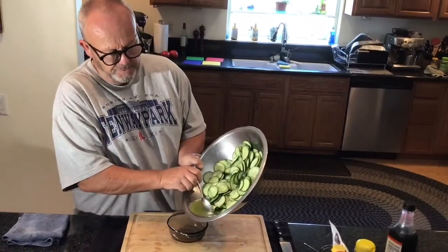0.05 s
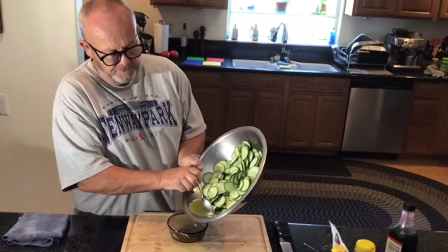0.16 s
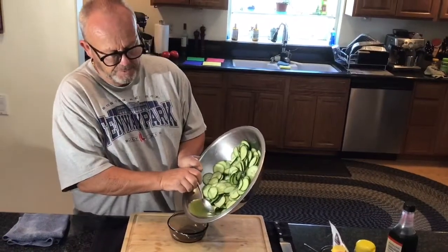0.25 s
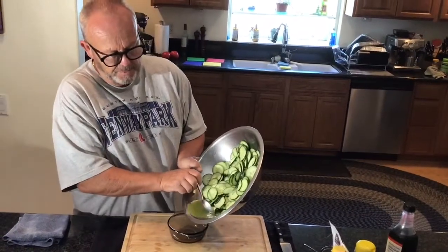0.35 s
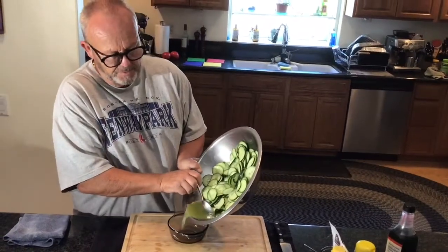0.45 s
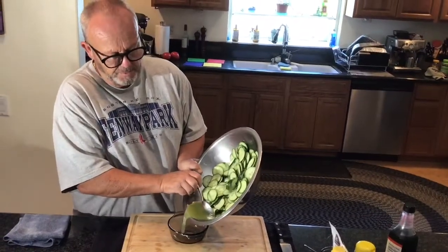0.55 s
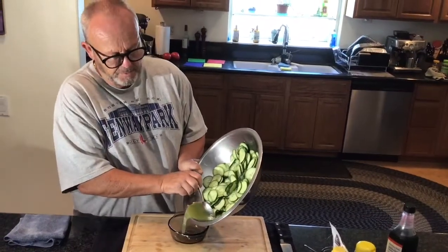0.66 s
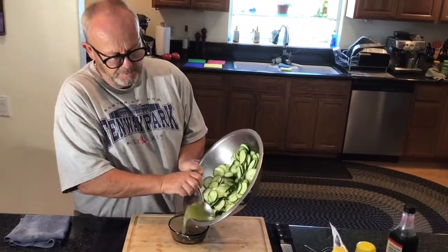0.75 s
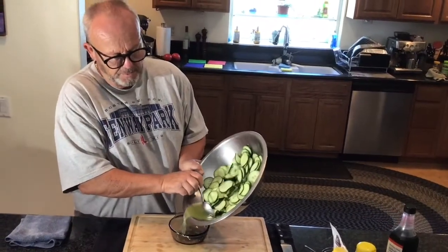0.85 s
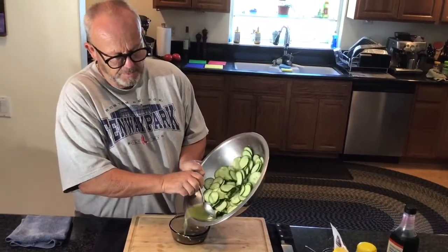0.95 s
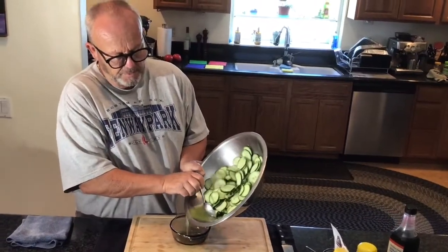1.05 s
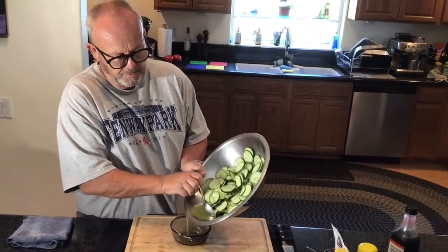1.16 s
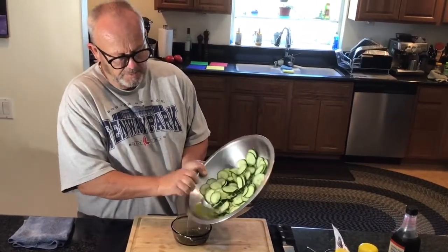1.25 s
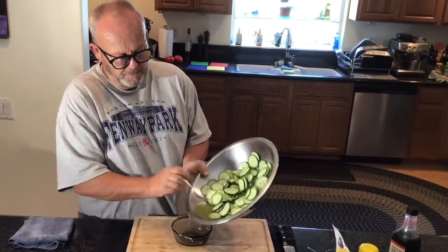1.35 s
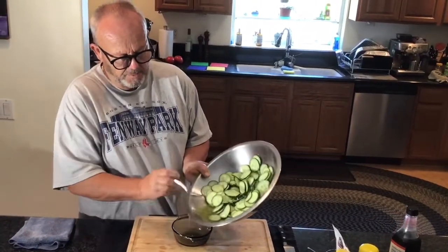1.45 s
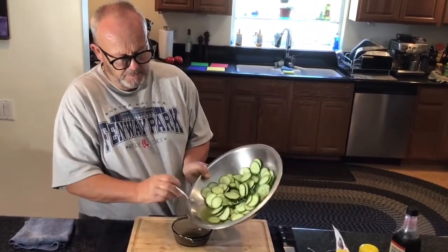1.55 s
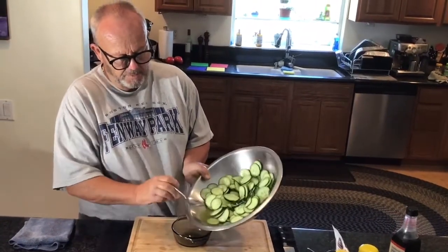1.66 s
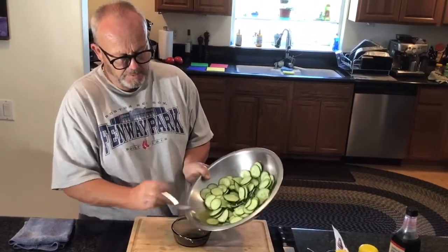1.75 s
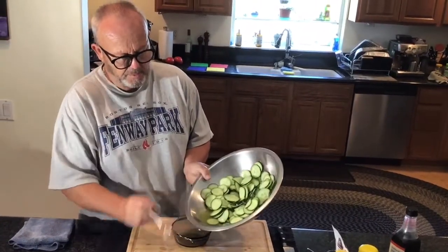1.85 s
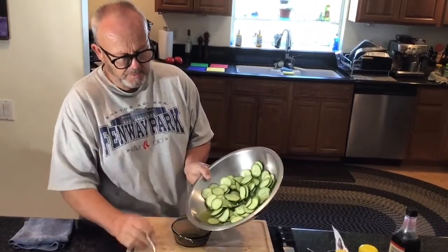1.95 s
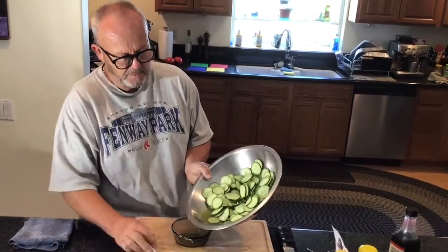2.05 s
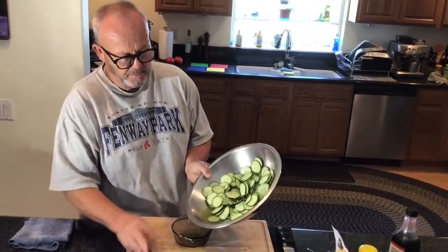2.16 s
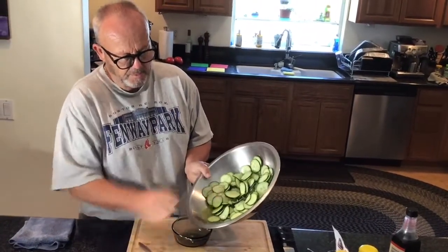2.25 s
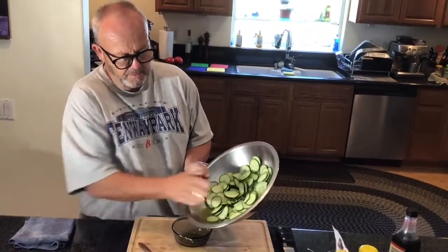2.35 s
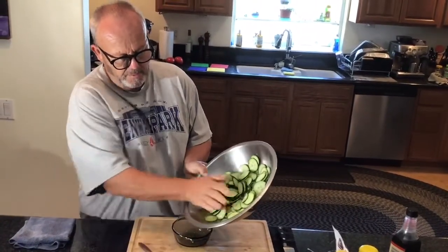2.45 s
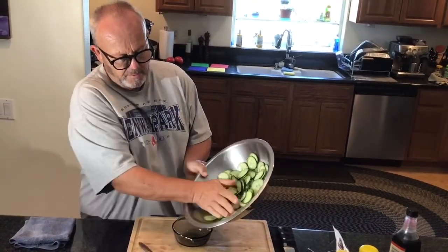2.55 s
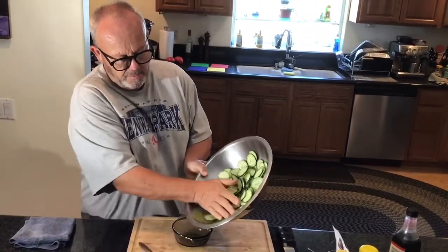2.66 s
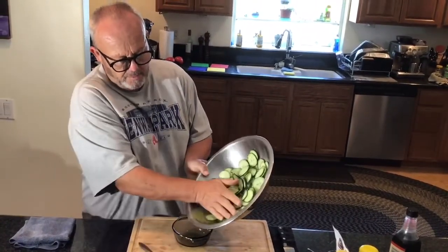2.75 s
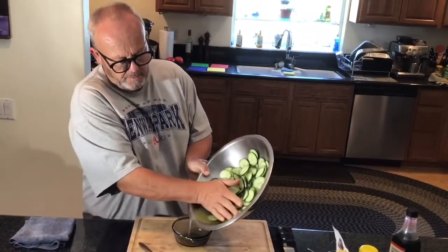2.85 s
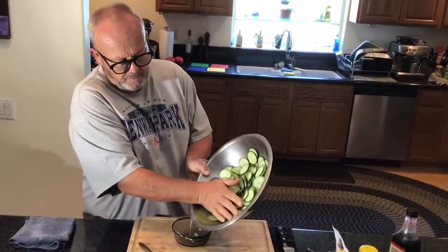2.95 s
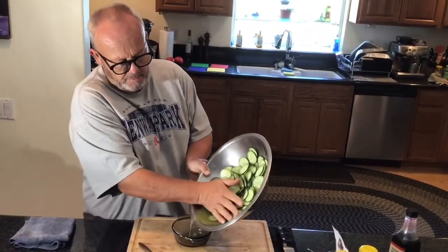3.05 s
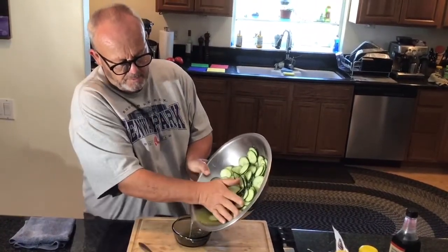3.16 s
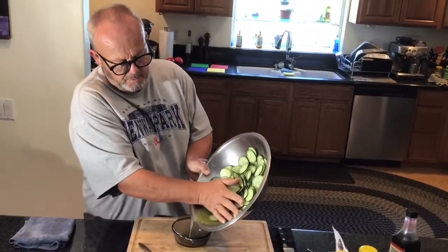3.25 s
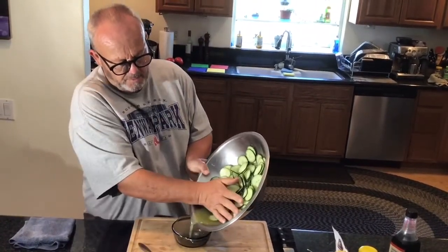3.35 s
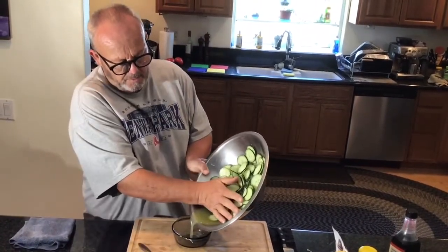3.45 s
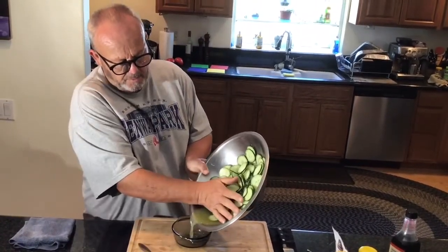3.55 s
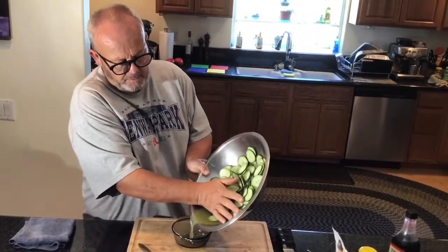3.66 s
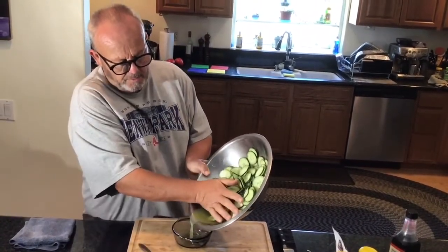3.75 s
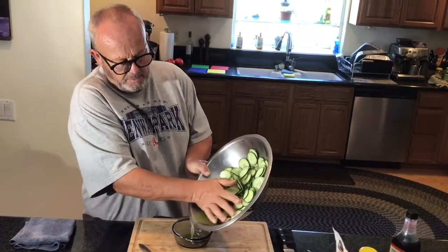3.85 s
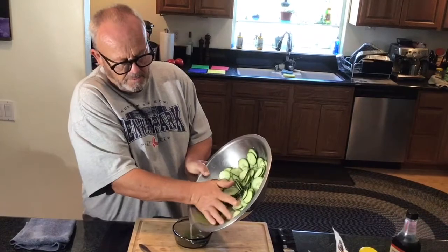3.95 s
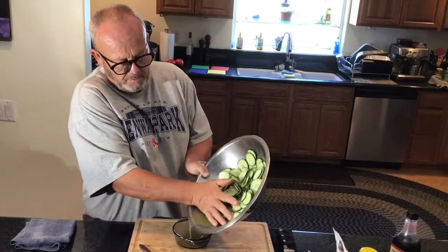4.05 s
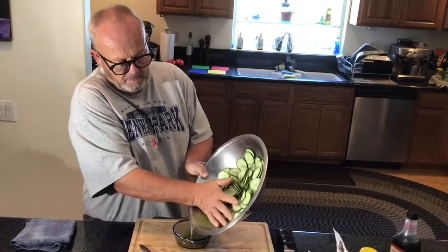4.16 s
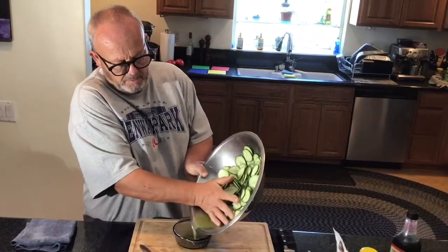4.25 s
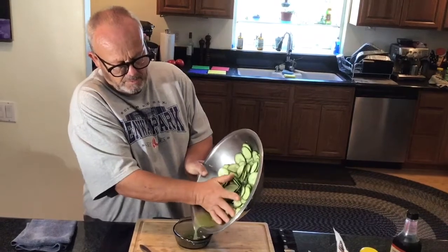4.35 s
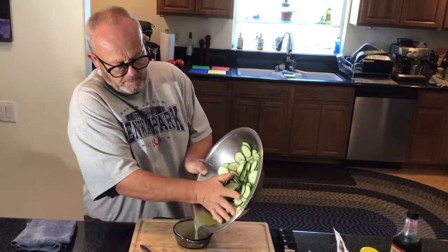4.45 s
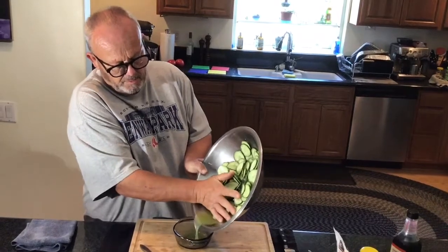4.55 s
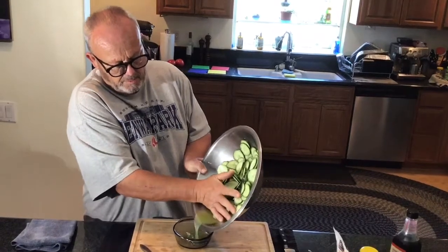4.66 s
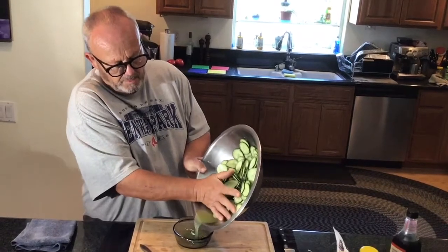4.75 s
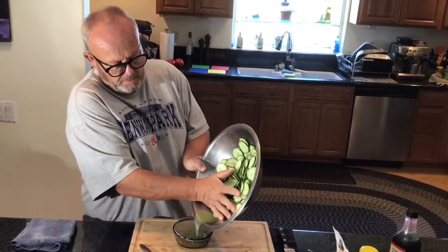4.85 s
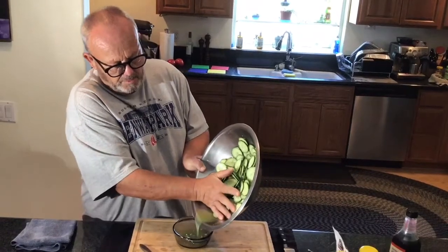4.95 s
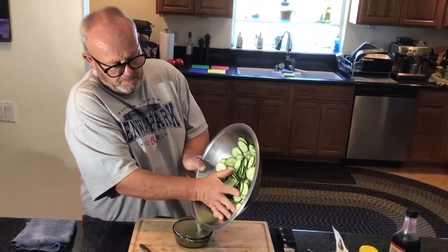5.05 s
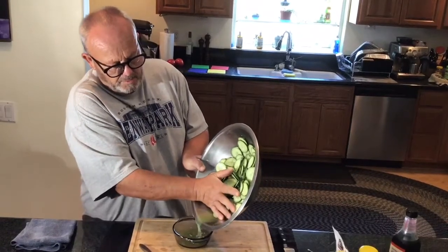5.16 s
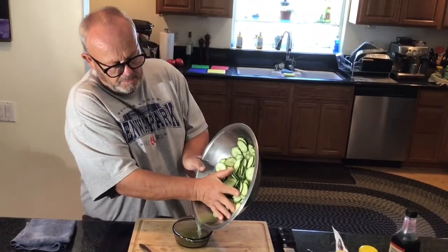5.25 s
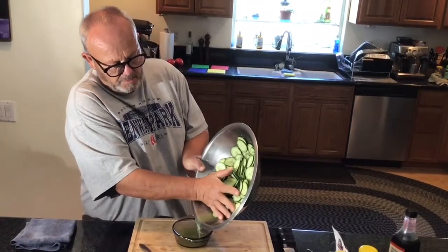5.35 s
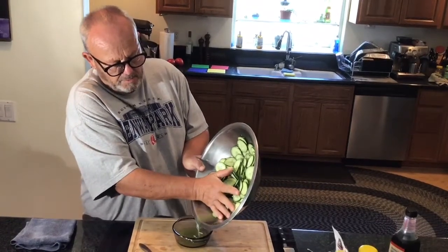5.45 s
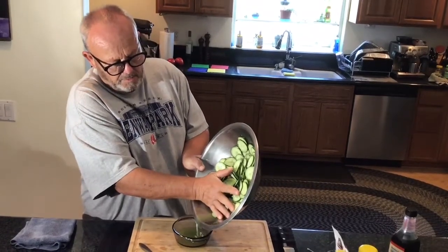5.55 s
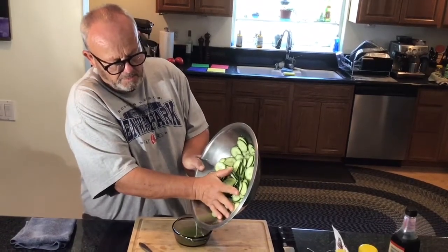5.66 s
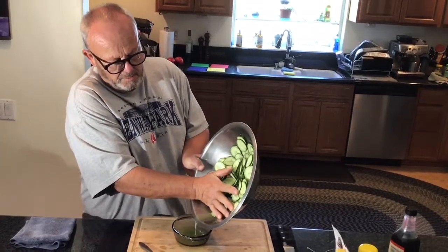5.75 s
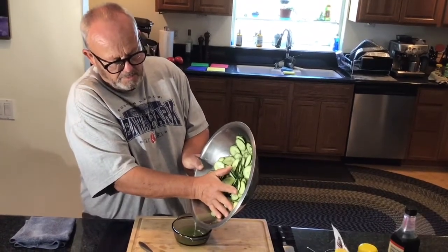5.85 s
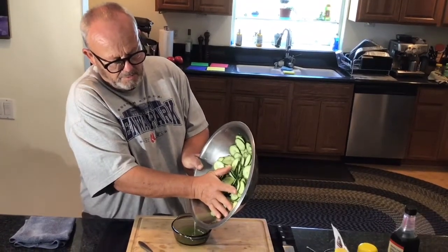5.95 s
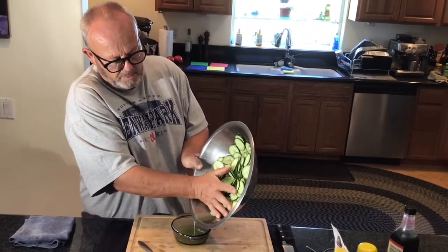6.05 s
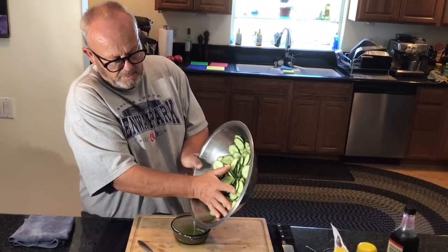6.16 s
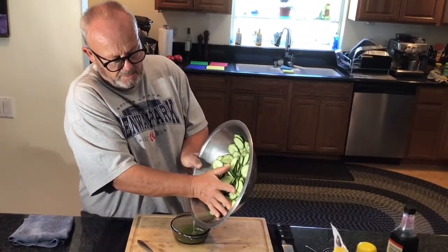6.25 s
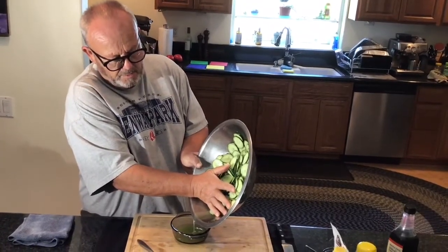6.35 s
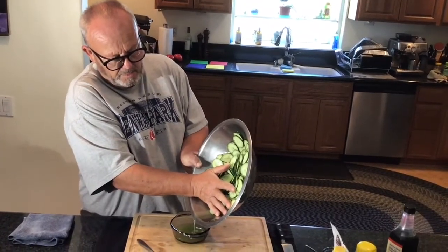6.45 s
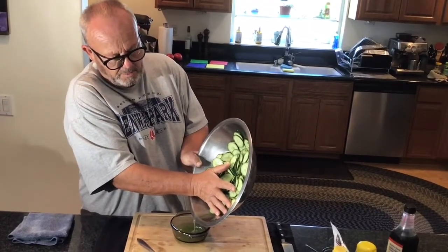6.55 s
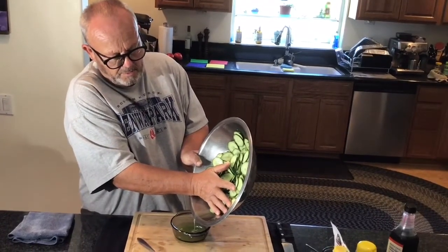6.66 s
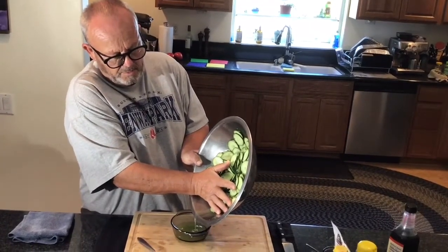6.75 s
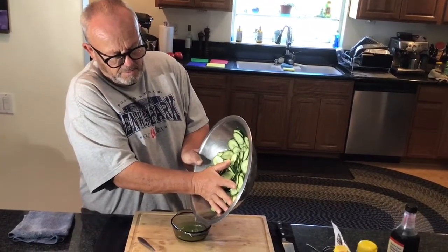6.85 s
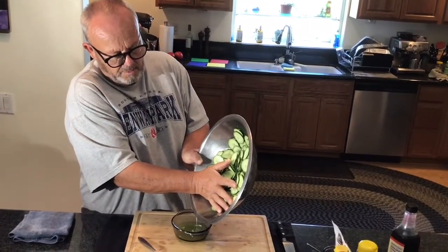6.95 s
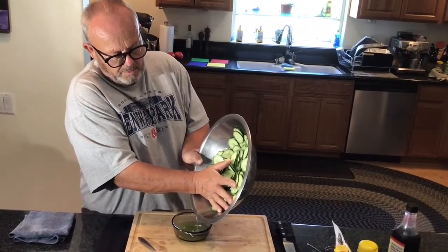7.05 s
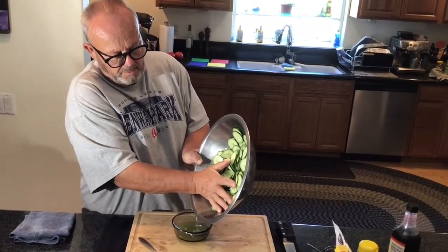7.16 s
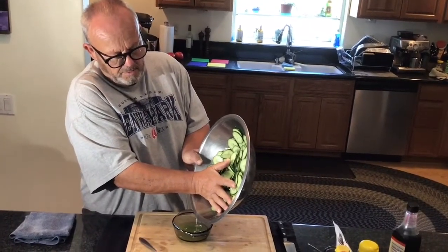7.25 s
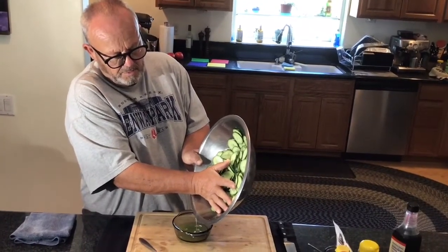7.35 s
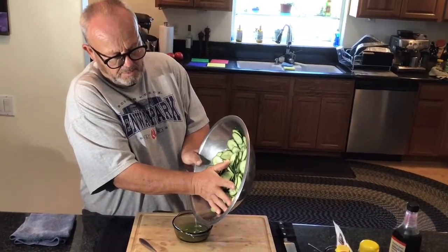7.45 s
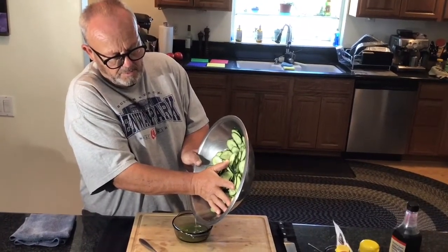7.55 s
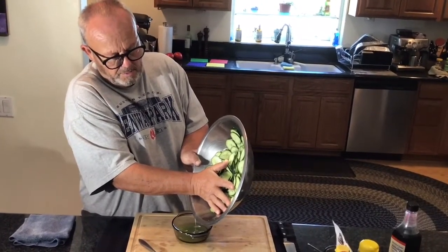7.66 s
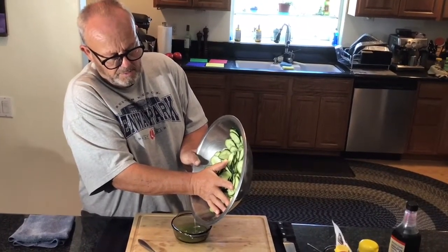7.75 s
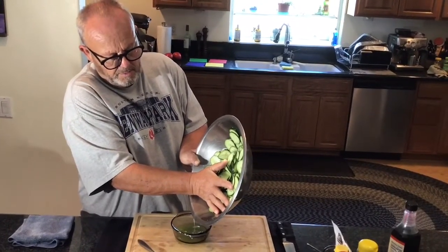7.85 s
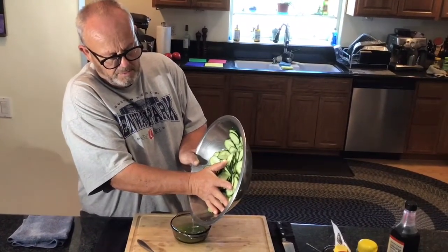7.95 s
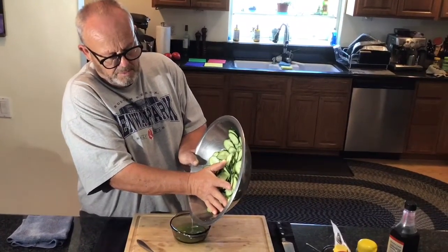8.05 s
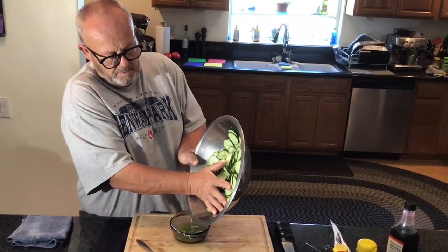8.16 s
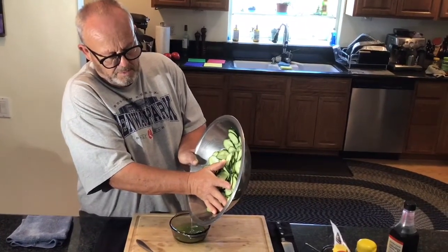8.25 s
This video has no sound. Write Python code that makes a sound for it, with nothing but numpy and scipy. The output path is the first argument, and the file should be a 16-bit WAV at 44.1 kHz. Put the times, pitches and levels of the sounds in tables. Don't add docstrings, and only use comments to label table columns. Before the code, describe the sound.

Light spoon scrapes and taps on steel, a sharp knock and rattle on wood, then sparse watery drips ringing a little glass bowl over faint fridge hum.

```python
import sys
import numpy as np
from scipy import signal
from scipy.io import wavfile
from scipy.ndimage import uniform_filter1d

SR = 44100
rng = np.random.default_rng(int(sys.argv[2]) if len(sys.argv) > 2 else 0)


def materialize(psi):
    bounded = np.clip(np.atleast_2d(psi).T, -1, 1)
    quanta = np.round(bounded * 32767).astype(np.int16)
    wavfile.write(sys.argv[1], SR, quanta)


def gain_from_db(level_db):
    decades = np.asarray(level_db, float) / 20
    return 10 ** decades


N = 366515
BOUNCE_S = 1.95


def band(x, hz, width):
    return signal.lfilter(*signal.iirpeak(min(hz, .45 * SR), max(hz / width, .3), fs=SR), x)


def lowpass(x, order, hz):
    return signal.sosfilt(signal.butter(order, hz, fs=SR, output="sos"), x)


def level(x, db):
    return x * gain_from_db(db) / np.sqrt(np.mean(x ** 2))


def add(out, s, x):
    i = int(s * SR)
    out[i:i + len(x)] += x[:N - i]


def walk(rate):
    k = int(SR / rate)
    held = np.repeat(rng.standard_normal(N // k + 1), k)
    return 0.69 * uniform_filter1d(uniform_filter1d(held, k), k)[:N]


def kitchen():
    # f/Hz, density/(dB per Hz)
    air = [(15, -46), (25, -18.5), (49, -5), (92, 2), (175, -8), (236, -10.5), (293, -10.5), (796, -17.5),
           (1520, -28), (2480, -28.5), (2690, -35.5), (2910, -32), (4030, -31), (14800, -39.5),
           (16000, -51)]
    # f/Hz, width/Hz, level/dB
    hum_bands = [(90, 69, -76), (242, 13, -76), (3924, 15, -99), (4700, 11, -101)]
    out, swell = 0, walk(0.61)
    hz_points, db_points = np.transpose(air)
    for hz in 25 * 2 ** np.arange(0, 9.4, 1 / 3):
        db = np.interp(np.log(hz), np.log(hz_points), db_points) + .5 * swell + 0.65 * walk(4.4)
        out = out + gain_from_db(db) * band(band(rng.standard_normal(N), hz, hz / 3), hz, hz / 2)
    out = signal.sosfilt(signal.ellip(6, .2, 9, 15000, fs=SR, output="sos"), out)
    hum = sum(level(band(rng.standard_normal(N), hz, width), db) for hz, width, db in hum_bands)
    whine_hz = 2600 + 3 * walk(1.8)
    whine = gain_from_db(-87 + 2.0 * walk(5)) * np.sin(2 * np.pi * np.cumsum(whine_hz) / SR)
    return level(out, -66.5) + hum + whine


def room(x, first_s=0.0034):
    # f/Hz, T60/s
    room_t60 = [(200, 0.6), (700, 0.43), (2000, 0.35), (5000, 0.47), (10000, 0.086), (16000, 0.074)]
    t = np.arange(SR * 3 // 4) / SR
    hz_points, t60_points = np.transpose(room_t60)
    tail = 0
    for hz in 125 * 2 ** np.arange(0, 7.4, .5):
        t60 = np.interp(np.log(hz), np.log(hz_points), t60_points)
        tail = tail + band(rng.standard_normal(len(t)), hz, hz / 2.0) * 1000. ** (-t / t60)
    tail = tail * np.clip(t / first_s - .5, 0, 1)
    return signal.fftconvolve(x, tail / np.sqrt(np.sum(tail ** 2)))[:N]


def glass():
    # t/s, peak level/dB
    drops = [(3.7996, -63), (3.8535, -59), (4.153, -62), (4.17, -66), (4.227, -69), (4.4893, -72.5),
             (4.6237, -71), (4.8, -62.5), (4.83, -65), (4.86, -71), (4.9482, -75), (5.0035, -62.5),
             (5.2026, -71), (5.401, -59), (5.408, -58), (5.434, -71.5), (6.7994, -76.5), (6.873, -70),
             (7.1121, -53.5), (7.1354, -63), (7.148, -59.5), (7.224, -62), (7.259, -61), (7.4576, -63),
             (7.51, -66), (7.7064, -64), (7.889, -71), (7.9194, -68), (8.088, -68), (8.265, -71)]
    full_hz, sink_hz, fill_s, t60 = 4720, 640, 1.39, 0.078
    out, t = np.zeros(N), np.arange(8192) / SR
    for (s, db), (split, phase) in zip(drops, rng.random((len(drops), 2))):
        hz = full_hz + sink_hz * np.exp(-(s - drops[0][0]) / fill_s)
        pair = np.sin(2 * np.pi * hz * t)
        pair += 0.5 * np.sin(2 * np.pi * ((hz + 30 + 50 * split) * t + phase))
        pair *= 1 + 1.04 * np.exp(-t / 0.006)
        pair *= np.minimum(t / 0.00055, 1)
        add(out, s, gain_from_db(db - 10.0) * pair * 1000. ** (-t / t60))
    return out


def bubble(hz, cycles, glide):
    turns = np.arange(int(1.2 * cycles * SR / hz)) / SR * hz
    life = turns / cycles
    ring = np.sin(2 * np.pi * turns * (1 + (glide - 1) * life))
    return ring * 1000. ** -life * np.minimum(turns / 1.07, 1)


def tick(hz, decay_s=0.0025):
    t = np.arange(512) / SR
    snap = rng.standard_normal(512) * np.exp(-t / decay_s)
    snap = signal.sosfilt(signal.butter(4, min(hz, 15000), "high", fs=SR, output="sos"), snap)
    return 1.25 * band(snap, 1.14 * hz, 1.05 * hz)


def brine():
    # t/s, peak level/dB, f/Hz, life/cycles, glide ratio
    gulps = [(3.714, -62, 1576, 67, 0.91), (3.8855, -60, 2930, 19, 1), (3.738, -71.5, 1990, 35, 1.5),
             (3.9933, -68, 1990, 14, 1.2), (4.415, -61.5, 1900, 18, 1.37), (4.634, -66, 2730, 75, 1),
             (5.1388, -61, 3160, 45, 1.5), (5.203, -66, 1500, 105, 1.14), (5.24, -64.5, 1605, 69, 1.05),
             (5.318, -70, 2450, 50, 1.1), (5.335, -68, 2650, 42, 0.92), (5.36, -69, 2500, 40, 0.92),
             (5.432, -68.5, 2500, 50, .9), (5.452, -70, 2250, 40, .95), (5.472, -67, 2100, 46, .95),
             (5.3993, -61.5, 2417, 48, 1.1), (6.146, -66.5, 2040, 51, 1.23), (6.2305, -62, 1635, 40, 0.96),
             (6.4763, -65, 2230, 51, 0.89), (6.876, -68.5, 1990, 60, 0.94), (7.2199, -61, 2580, 69, 1.03),
             (7.468, -71, 2600, 49, 1.05), (7.5079, -70, 2210, 77, 0.97), (7.6749, -64, 2520, 45, 0.95),
             (7.872, -59, 3100, 39, 1.05), (8.0817, -67, 2930, 46, 0.97), (8.2626, -64, 2770, 52, 1.05)]
    # t/s, peak level/dB, f/Hz
    plinks = [(3.817, -70, 3950), (3.831, -67, 4080), (3.87, -52.5, 6960), (3.903, -62.5, 7000),
              (4.4912, -81.5, 5070), (4.511, -70, 5200), (4.773, -71.5, 4050), (5.1387, -61.5, 3410),
              (5.158, -67, 5500), (5.3306, -66, 4550), (6.6228, -62, 7740), (6.782, -66.5, 4590),
              (6.873, -64, 5490), (7.221, -55.5, 4220), (7.2547, -57, 6480), (7.5075, -64, 4960),
              (7.6972, -58, 7400), (7.797, -64, 6930), (7.84, -60.5, 7600), (7.868, -70, 4060),
              (7.889, -54.5, 5010), (7.959, -61.5, 5700), (8.262, -67, 4580)]
    # t/s, peak level/dB, f/Hz
    tiny = [(3.72, -63.5, 12840), (3.782, -57, 10800), (3.8691, -48, 8700), (4.0088, -60, 13200),
            (4.302, -62.5, 8500), (4.491, -61, 8500), (4.5117, -55.5, 8200), (4.696, -64, 8200),
            (4.7991, -64, 9320), (4.816, -52.5, 8160), (4.865, -56.5, 8100), (4.9296, -54.5, 8300),
            (5.0146, -61, 14400), (5.3997, -52.5, 14780), (6.167, -63.5, 15400), (6.4938, -60, 9960),
            (6.598, -54, 13400), (6.873, -65, 9380), (7.1113, -65, 9830), (7.124, -53, 10200),
            (7.2206, -67, 8640), (7.2408, -49.5, 8750), (7.4483, -59, 10440), (7.5064, -56, 10730),
            (7.6967, -59, 10500), (7.7634, -59, 14700), (7.7955, -67, 9110), (7.8405, -59.5, 9100),
            (7.8886, -67, 8300), (7.9576, -60, 8500)]
    # t/s, f/Hz
    specks = [(3.989, 8700), (4.1511, 8500), (4.3546, 14500), (5.3469, 13200), (5.42, 9500), (6.145, 13040),
              (6.5347, 14500), (6.622, 11300), (7.6112, 8600), (7.8686, 8480), (8.1709, 14200),
              (8.2712, 14100)]
    # t/s, peak level/dB, f/Hz
    splashes = [(3.745, -70, 2470), (3.7953, -56, 3950), (3.805, -60, 4200), (3.847, -63, 5700),
                (3.867, -58, 5900), (3.88, -65, 3700), (4.152, -66, 6200), (4.203, -65, 2600),
                (4.292, -63, 4850), (4.488, -67, 3000), (4.8155, -61, 4800), (4.817, -62, 6600),
                (4.8315, -58, 4000), (4.839, -63, 4300), (4.948, -60, 4650), (5.203, -66, 4150),
                (5.228, -64, 2540), (5.2285, -67, 3400), (6.146, -66, 4900), (6.168, -68, 2100),
                (6.268, -66, 1700), (6.52, -67, 7000), (6.784, -67, 3300), (6.812, -68, 2100),
                (6.9335, -61, 4100), (6.942, -63, 4200), (6.97, -67, 4100), (7.111, -59, 6800),
                (7.1112, -56, 4700), (7.221, -61, 6700), (7.264, -61, 4200), (7.265, -65, 2000),
                (7.277, -62, 5900), (7.295, -63, 5900), (7.301, -64, 5000), (7.458, -63, 4600),
                (7.5075, -58, 7000), (7.611, -67, 4400), (7.869, -64, 2300), (8.026, -66, 3500),
                (8.057, -67, 2600), (8.09, -67, 4400)]
    # t/s, spray level/dB
    flow = [(3.65, -82), (3.9, -83.5), (4.3, -79.5), (4.7, -80.5), (5.0, -77), (5.45, -69.5), (5.6, -90.5),
            (6.05, -88.5), (6.5, -79), (6.9, -75), (7.3, -87.5), (7.9, -79.5), (8.3, -90)]
    out = np.zeros(N)
    for s, db, hz, cycles, glide in gulps:
        add(out, s, gain_from_db(db) * bubble(hz, cycles, glide))
        add(out, s, gain_from_db(db - 11) * tick(0.92 * hz, decay_s=0.0053))
    for s, db, hz in plinks:
        add(out, s, gain_from_db(db + 1.0) * bubble(hz, 73, 0.94))
        add(out, s, gain_from_db(db - 3.5) * tick(0.88 * hz))
    for s, db, hz in tiny + [(s, -64.5, hz) for s, hz in specks]:
        add(out, s, gain_from_db(db) * bubble(hz, 42, 1.04))
        add(out, s, gain_from_db(db - 7) * tick(0.79 * hz))
    for s, db, hz in splashes:
        add(out, s, gain_from_db(db + 2.5) * bubble(hz, 27.9, 1.05))
    for at, pitch, size in rng.random((900, 3)):
        s = flow[0][0] + (flow[-1][0] - flow[0][0]) * at
        db = np.interp(s, *np.transpose(flow)) - 2.7 * np.log(max(size, .07))
        add(out, s, gain_from_db(db) * bubble(2200 * 5 ** pitch ** 1.5, 14, 1.3))
    return out


def rim():
    # t/s, peak level/dB, centre f/Hz, width/Hz, decay/s
    scrapes = [(0.0, -54.5, 3900, 970, .027), (.033, -70, 3950, 700, .033), (.017, -66, 1400, 200, .027),
               (.31, -54, 700, 300, .006), (.323, -58, 665, 294, .0094), (.334, -57.5, 2330, 500, .023),
               (.335, -59, 4120, 1500, .023), (.337, -62.5, 11000, 9000, .015),
               (.371, -62, 2420, 600, .015), (.362, -65.5, 6000, 6000, .018), (.537, -70, 3710, 300, .007),
               (0.0, -57, 500, 200, .01), (.8178, -68, 9100, 300, .015), (.82, -74, 5720, 100, .04),
               (1.2033, -45.5, 2740, 1300, .0054), (1.2027, -51, 7500, 7000, .0024),
               (1.224, -67.5, 2750, 400, .04), (1.794, -64.5, 2150, 1200, .026)]
    # t/s, peak level/dB, f/Hz
    taps = [
        (.775, -72, 11000),
        (1.2029, -58, 1300),
        (1.2058, -55, 5000),
        (.334, -68, 2330),
        (.8178, -64, 6500),
        (1.2033, -50, 2740),
        (1.2027, -56, 8500),
    ]
    out, t = np.zeros(N), np.arange(8192) / SR
    for s, db, hz, width, length in scrapes:
        slips = rng.standard_normal(8192) * rng.random(8192) ** 2
        slips[0] = 3.7
        scrape = band(band(slips, hz, width), hz, 2 * width)
        add(out, s, level(scrape, db - 8.0) * np.exp(-t / length))
    for s, db, hz in taps:
        add(out, s, gain_from_db(db) * tick(hz))
    return out


def board():
    # f/Hz, width/Hz, level in the first fall/dB, level after the bounce/dB
    modes = [(149, 40, -17.5, -16), (273, 23, -5.5, -4.5), (472, 100, -11.5, -6), (640, 56, 2.5, -2),
             (797.4, 48, -9, -1.5), (970, 120, -11, -13.5), (1145, 120, -7, -8), (1360, 70, -7, -11.5),
             (1395, 69, -11, -0.5), (1500, 80, -1.5, -7.5), (1608, 100, -8, -10.5), (1880, 260, -9.5, -8),
             (2100, 60, 2.5, 1.5), (2275, 85, -2, 2.5), (2300, 49, -4, -4.5), (2470, 80, -9, -7.5),
             (2669, 170, -8.5, -7), (2930, 120, -3, -3), (3305, 61, -3, -2), (3700, 400, -11.5, -12.5),
             (4300, 300, -21.5, -9.5)]
    # t/s, blow level/dB, striking spot round the spoon (0-1), edge crack level/dB
    knocks = [(1.8179, -30.5, 0.6, -14), (1.8178, -11.5, 0.41, -36), (1.8215, -32, 0.17, -26.5),
              (1.828, -39, .36, -42.5), (1.86, -47, 0, -31.5), (1.90, -33, 0.9, -35),
              (1.935, -54, 0.1, -35), (1.9555, -18.5, 1, -22), (1.959, -19.5, 0.74, -19.5),
              (1.9675, -19, 0.21, -30), (1.977, -25, 0.44, -34.5), (1.972, -26.5, 0.9, -21.5),
              (1.981, -29.5, 0.76, -15), (1.992, -26, 0.45, -25), (2.003, -31, 0.84, -28),
              (2.012, -22.5, 0.75, -32), (2.024, -28.5, 0.9, -25), (2.037, -26, 0.8, -30),
              (2.048, -27.5, 0.49, -34.5), (2.06, -34, 0.42, -32), (2.068, -31.5, 0.3, -31),
              (2.083, -35.5, 0.93, -18), (2.1, -40, 0.9, -28), (2.125, -41, 0.6, -28),
              (2.15, -62, 0.6, -23.5), (2.19, -59, 0.8, -29), (2.235, -58, 0.5, -28)]
    # t/s, level/dB
    rattle = [(1.815, -88), (1.821, -56), (1.87, -62), (1.95, -72), (1.958, -42), (1.985, -40.5),
              (2.03, -49), (2.07, -54), (2.12, -69), (2.2, -72), (2.3, -90)]
    wood, crack, t = np.zeros(N), np.zeros(N), np.arange(8192) / SR
    family = np.searchsorted([1000, 2500], np.array(modes)[:, 0])
    for s, db, spot, crack_db in knocks:
        family_db = 6.5 * np.cos(2 * np.pi * (spot - np.arange(3) / 3))
        chatter = rng.standard_normal(8192) * np.exp(-t / 0.0022)
        push = 0.08 * chatter + 7.29 * (t == 0)
        scatter = rng.standard_normal((len(modes), 2))
        for i, (hz, width, *fall_db) in enumerate(modes):
            detune, luck = scatter[i]
            mode_db = db + family_db[family[i]] + fall_db[s > BOUNCE_S] + 2.0 * luck
            ring = band(push, hz * (1 + .008 * detune), width)
            add(wood, s, (-1) ** i * gain_from_db(mode_db) * ring)
        add(crack, s, gain_from_db(db + crack_db) * chatter * np.exp(-t / 0.0032))
    buzz_db = np.interp(np.arange(N) / SR, *np.transpose(rattle), left=-200, right=-200)
    buzz = rng.standard_normal(N) * rng.random(N) ** 3 * gain_from_db(buzz_db)
    edge = gain_from_db(11.5) * band(band(crack, 6000, 7100), 6000, 7000)
    edge += gain_from_db(7.5) * band(band(buzz, 2600, 1800), 2600, 2500)
    edge += gain_from_db(2.5) * band(buzz, 7800, 3000)
    first_snap = gain_from_db(-2.5) * band(crack, 13000, 6000) * (np.arange(N) < BOUNCE_S * SR)
    return gain_from_db(8.5) * lowpass(wood, 3, 3900) + lowpass(edge, 4, 10500) + first_snap


def spoon():
    # f/Hz, group (0-3), level in the first fall/dB, level after the bounce/dB, T60/s
    modes = [(4920, 0, -6, -6, .25), (4450, 0, -25, -22, .3), (2960, 0, -30, -17, .2),
             (3280, 0, -30, -20, .2), (4161, 0, -40, -25, .2), (4237, 0, -40, -27, .2),
             (6078, 1, -5, 0, .3), (8812, 1, -9, -19, .5), (9378, 2, -8, -8, .4), (10335, 2, -12, -11, .3),
             (10595, 2, -5, -2, .3), (13808, 3, -14, -3, .2), (14018, 3, -14, -5, .2),
             (15060, 3, -14, -7, .2), (15712, 3, -14, -9, .2)]
    # t/s, ring level of low modes/dB, of middle modes/dB
    low_blows = [(1.816, -35.5, -49), (1.832, -67, -62), (1.8592, -45, -60), (1.8994, -51.5, -73),
                 (1.955, -24.5, -59), (1.971, -54, -42.5), (1.9814, -36, -45), (1.9914, -56, -43.5),
                 (2.003, -36, -41), (2.012, -33.5, -45.5), (2.021, -34, -38), (2.0344, -38.5, -48.5),
                 (2.0507, -32, -59), (2.072, -50, -50), (2.079, -36.5, -67), (2.099, -43, -63),
                 (2.1244, -44, -73), (2.1494, -49.5, -60), (2.1644, -78.5, -75), (2.1876, -74, -67.5),
                 (2.218, -67, -68), (2.2263, -85, -97.5), (2.2397, -86.5, -78), (2.27, -95, -76)]
    # t/s, ring level of high modes/dB, of topmost/dB
    landings = [
        (1.8175, -64, -73),
        (1.8592, -82.5, -78.5),
        (1.9562, -47, -51),
        (1.969, -48, -62.5),
        (1.9914, -47, -63.5),
        (2.012, -55, -59),
        (2.0354, -53.5, -60),
        (2.052, -56, -63),
        (2.0714, -58.5, -64),
    ]
    start_s = low_blows[0][0]
    t = start_s + np.arange(1, SR) / SR
    ring, out = 0, np.zeros(N)
    for hz, group, first_db, later_db, t60 in modes:
        blows = np.array(low_blows if group < 2 else landings)
        last = np.clip(np.searchsorted(blows[:, 0], t) - 1, 0, None)
        db = np.where(t > BOUNCE_S, later_db, first_db)
        decay_db = 60 * (t - blows[last, 0]) / t60
        size = gain_from_db(db + 2.5 + blows[last, 1 + int(group) % 2] - decay_db)
        jolt = np.cumsum(.07 * rng.standard_normal(len(blows)))[last] + rng.random()
        size = signal.lfilter([.012], [1, -.988], size * np.exp(2j * np.pi * jolt))
        ring = ring + np.imag(size * np.exp(2j * np.pi * hz * t))
    add(out, start_s, ring)
    return out


def scene():
    water, ring, scrapes, wood, steel = brine(), glass(), rim(), board(), spoon()
    near = water + scrapes
    add(near, .0037, gain_from_db(-6.5) * band(near, 8200, 14000))
    wet = gain_from_db(-2.0) * water + gain_from_db(-3.5) * ring + gain_from_db(-6.0) * scrapes + gain_from_db(-6.5) * wood + gain_from_db(-17) * steel
    return (near + ring + wood + steel + room(wet) + kitchen())[None]


def low_pass(x):
    return signal.sosfilt(signal.butter(12, 16440, fs=SR, output="sos"), x)


def record(dry):
    dry = signal.sosfilt(signal.butter(7, 37, "high", fs=SR, output="sos"), dry)
    dry = signal.sosfilt(signal.ellip(8, .2, 60, 15800, fs=SR, output="sos"), dry)
    return low_pass(dry)


dry = scene()
out = record(dry)
materialize(out)
```